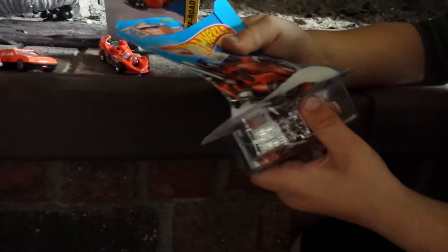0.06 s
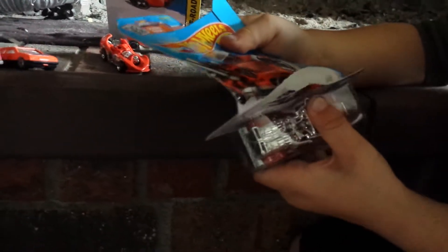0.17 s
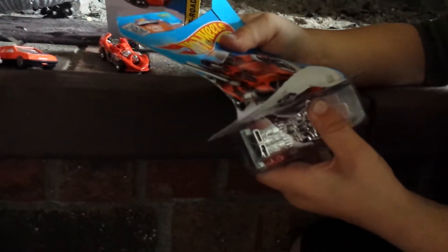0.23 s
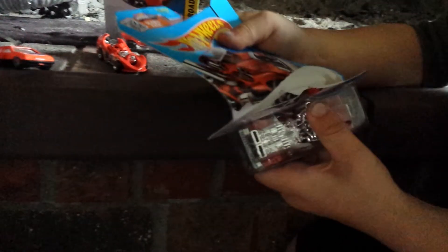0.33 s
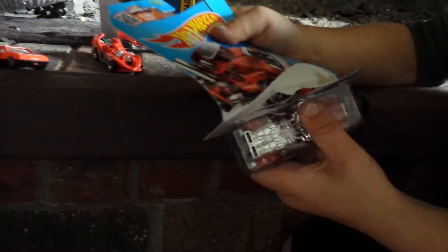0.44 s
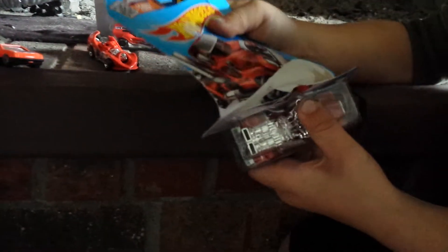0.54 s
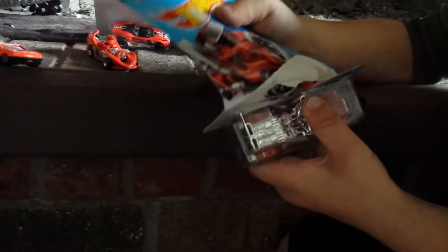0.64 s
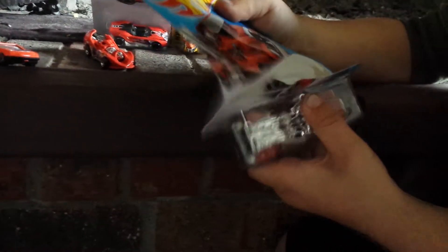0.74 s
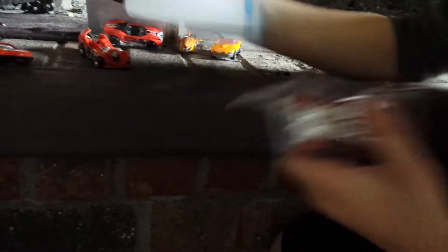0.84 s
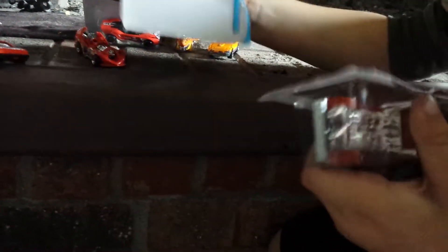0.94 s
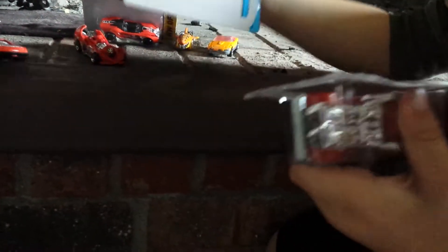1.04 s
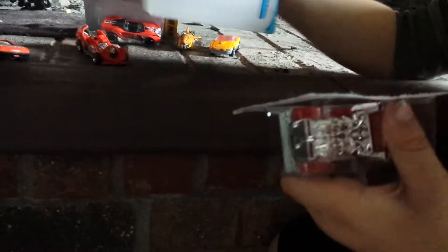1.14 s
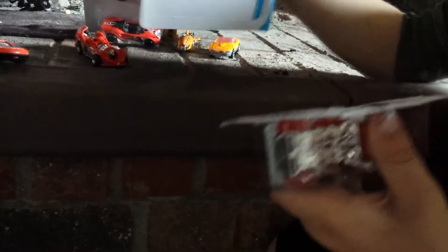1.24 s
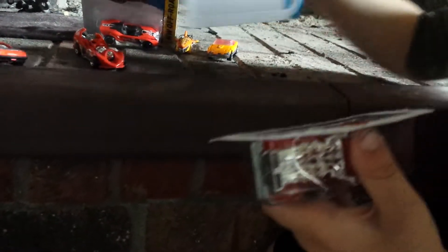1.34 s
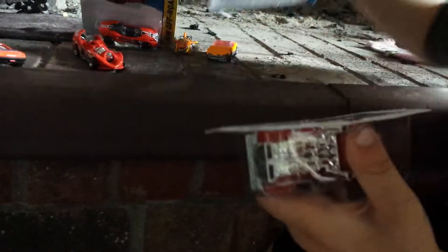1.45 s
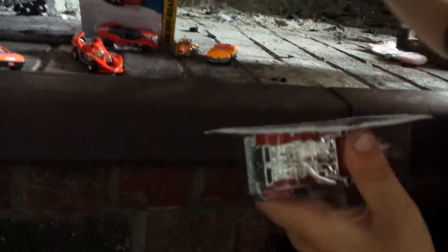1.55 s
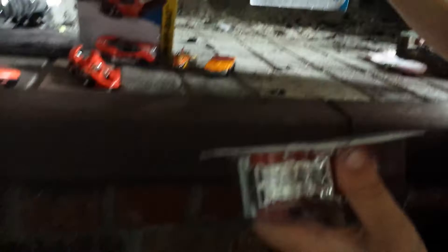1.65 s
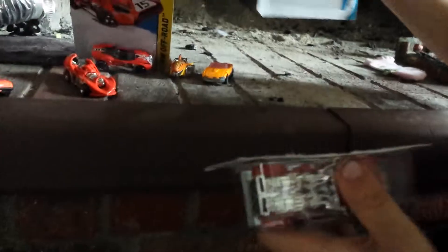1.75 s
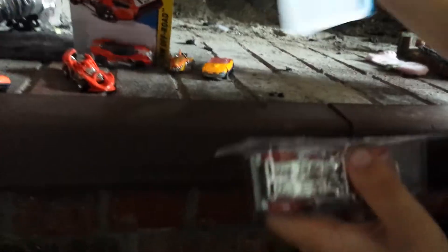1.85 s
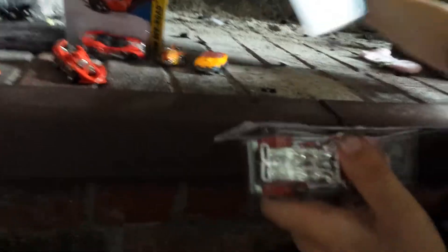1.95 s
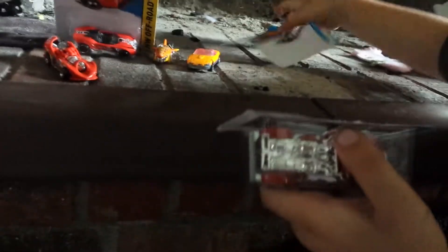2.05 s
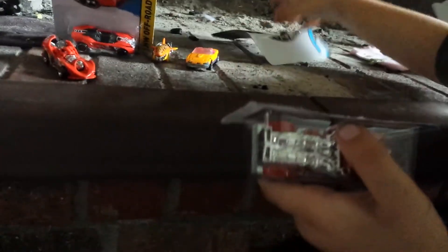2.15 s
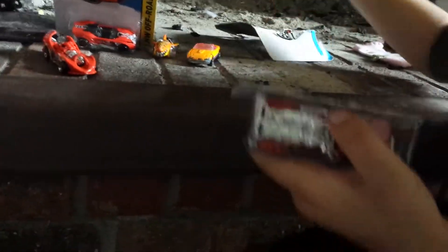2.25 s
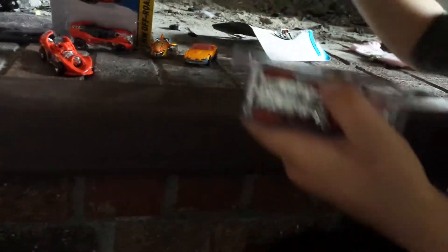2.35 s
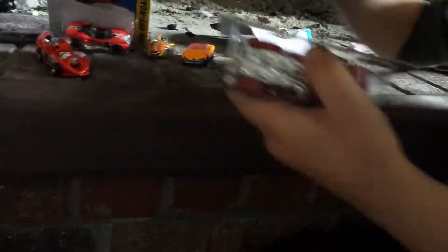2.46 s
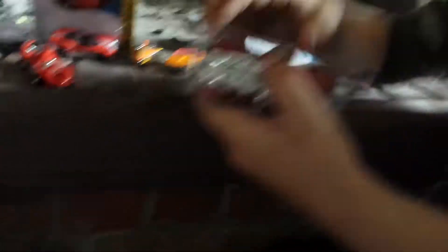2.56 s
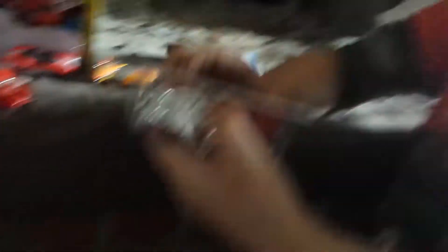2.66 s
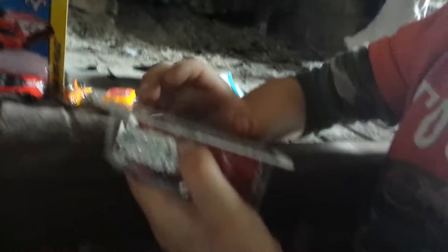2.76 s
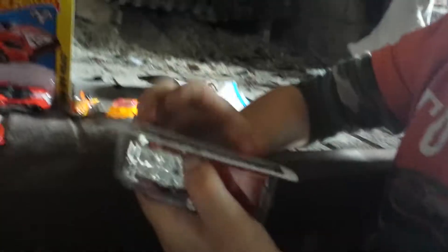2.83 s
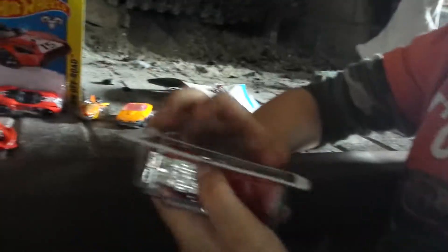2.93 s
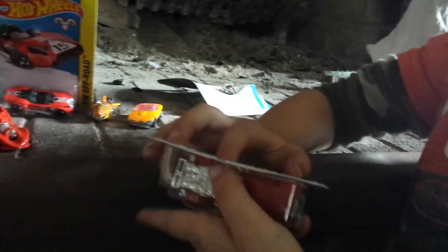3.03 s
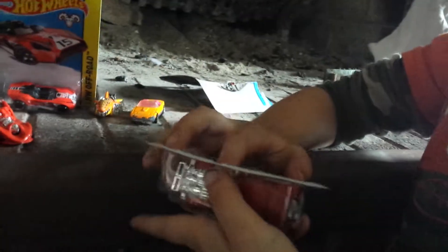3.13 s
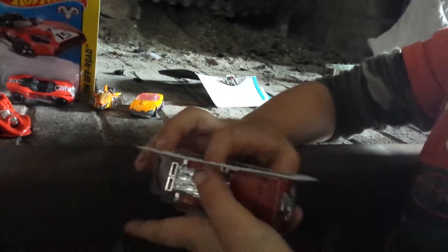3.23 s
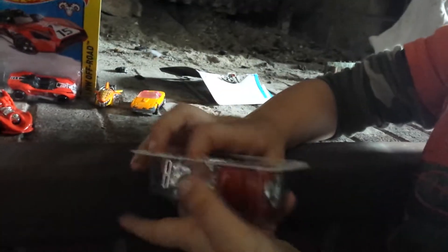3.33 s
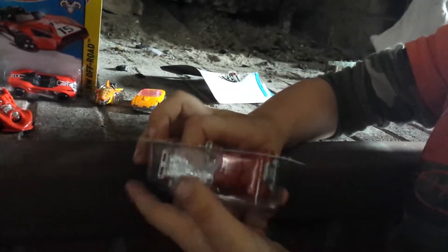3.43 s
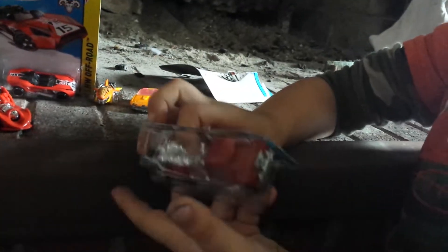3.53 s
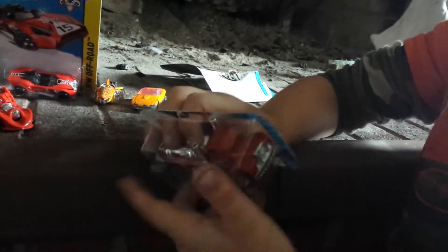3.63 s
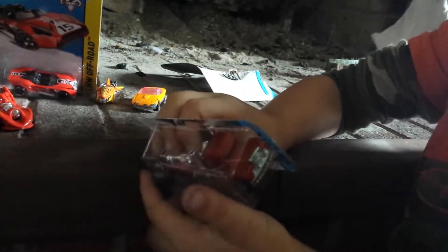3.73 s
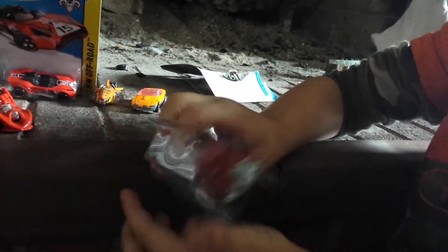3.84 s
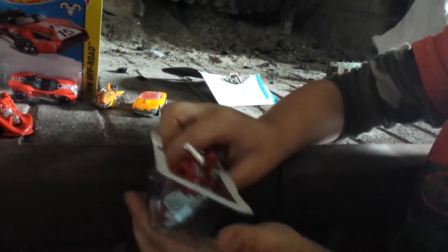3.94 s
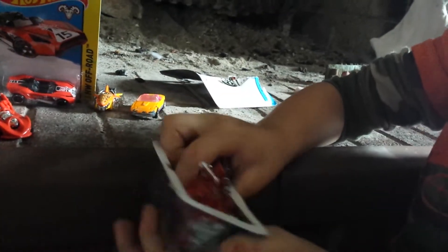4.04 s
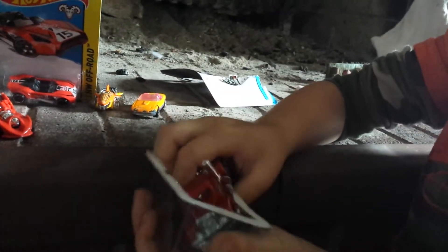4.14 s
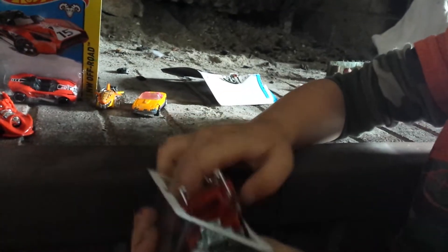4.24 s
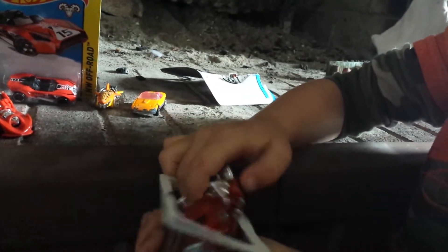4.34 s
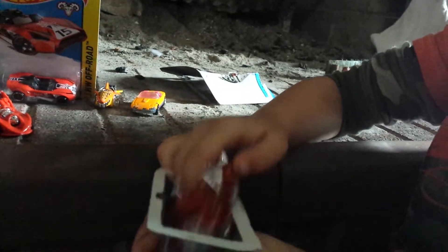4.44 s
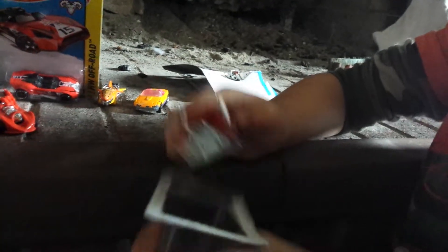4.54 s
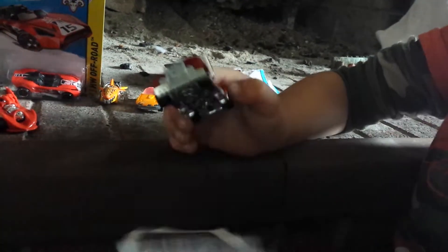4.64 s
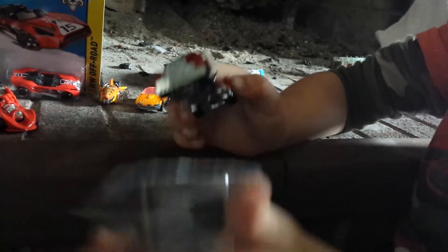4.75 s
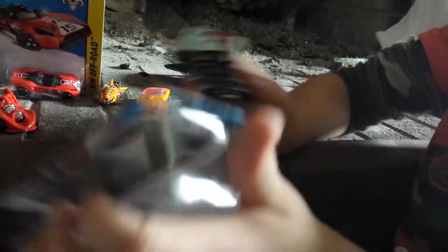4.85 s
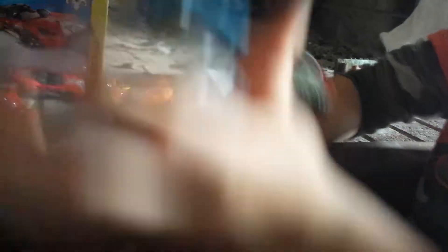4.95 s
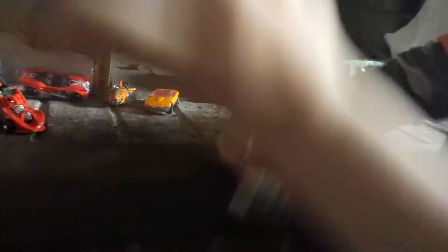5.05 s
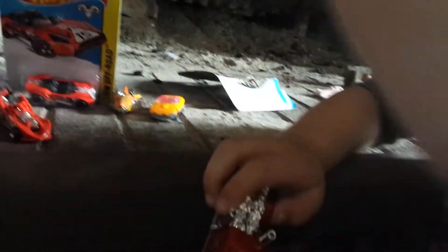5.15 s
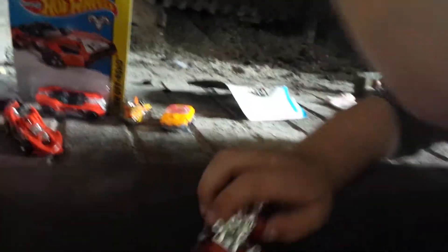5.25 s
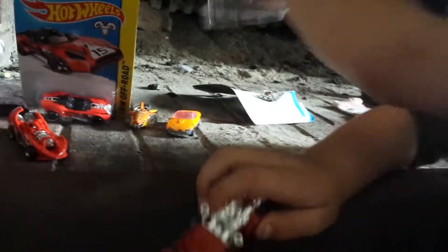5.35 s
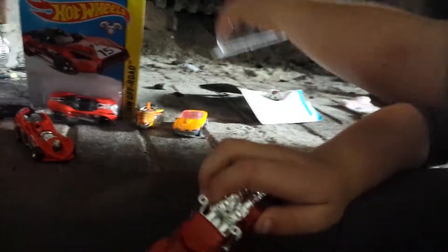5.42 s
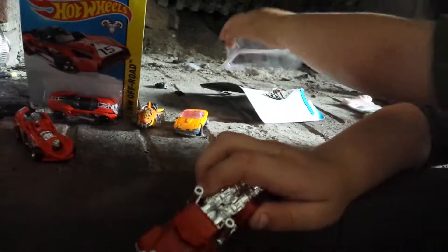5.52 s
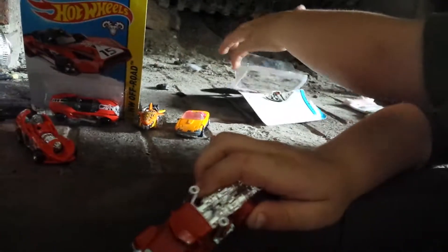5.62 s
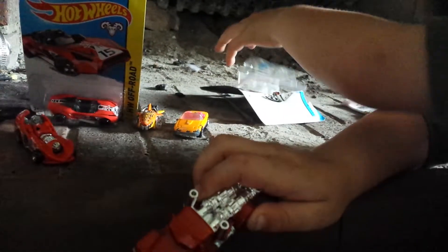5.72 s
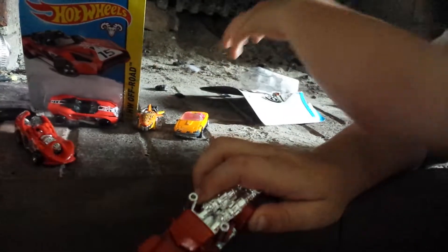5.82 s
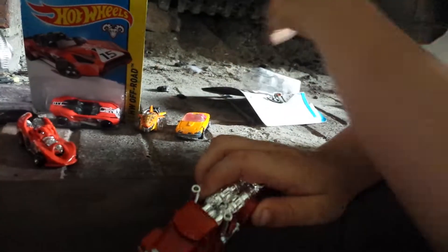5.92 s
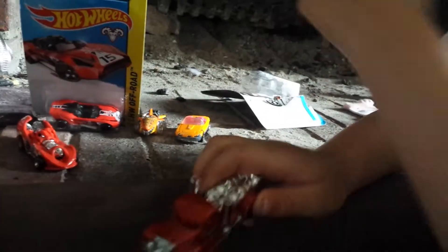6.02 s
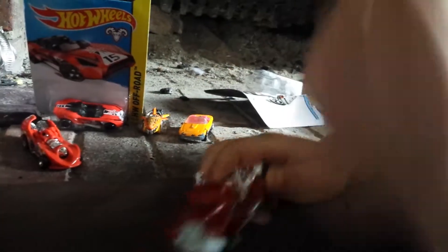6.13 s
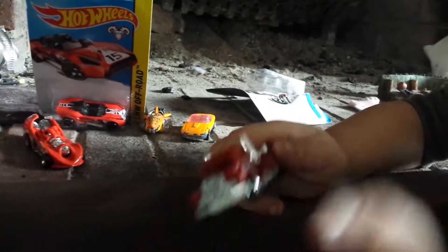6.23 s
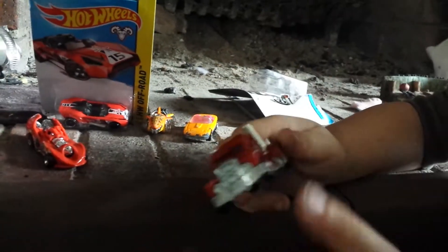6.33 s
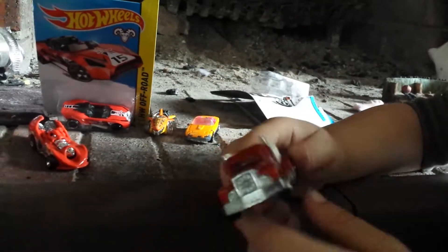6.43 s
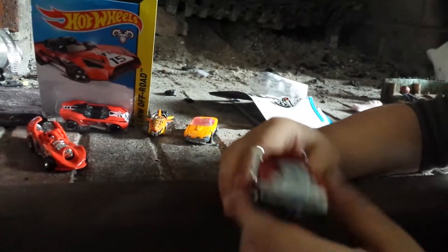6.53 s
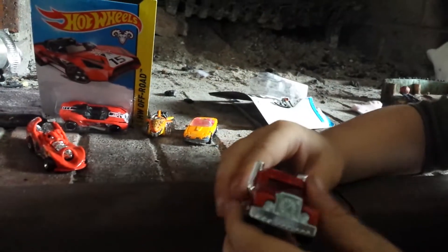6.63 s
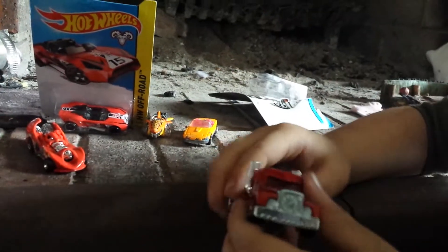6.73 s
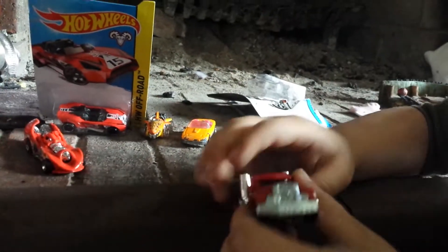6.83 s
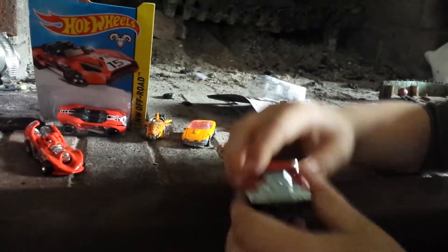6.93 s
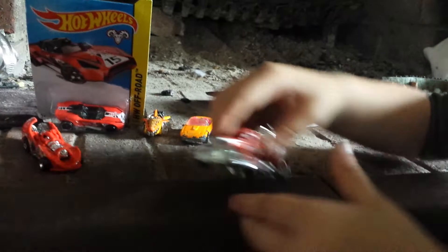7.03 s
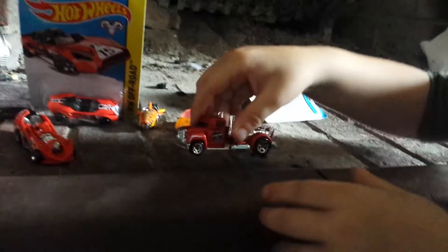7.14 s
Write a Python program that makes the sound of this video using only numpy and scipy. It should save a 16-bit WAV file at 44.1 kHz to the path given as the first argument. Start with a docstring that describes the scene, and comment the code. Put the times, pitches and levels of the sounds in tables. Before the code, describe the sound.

A small toy car's card and plastic pack is opened right beside a phone on a brick hearth. From 0 to 0.8 s card tears in short swelling rips with fine snapping fibres and crinkling, plus a plastic pop near 0.1 s. At about 0.85 s the pull peaks in a loud cluster of buckling cracks, then a single dry flick at 1.1 s. It goes nearly quiet until 2 s, when finger rubbing and light cracks return. A sharp crack lands at 3.05 s, more at 3.6 s, then one at 4.0 s with a brief metallic ring, and crackles and scrapes continue to 4.7 s. Isolated small knocks follow around 5.6 s. From 6.3 s tiny clicks and soft rubbing remain, with a thin wheel squeak near 6.8 s. Low rumbling air and soft thumps, mostly left, buffet the microphone; brick reflections are short and faint.

```python
"""Opening a toy car's pack

A child opens a toy car's pack at a brick hearth, a hand's length from a phone.
The backing card peels in tearing noise with snapping fibres, then flicks straight in one dry crack.
The thin plastic shell buckles in sharp cracks, made of noise bursts, ticks and ringing resonances.
Fingers slide as filtered noise, loose parts click, metal rings and a wheel squeaks.
Low noise and soft thumps of air buffet the microphone over a quiet background.
"""
import sys
import numpy as np
from scipy import signal
from scipy.fft import rfft, irfft, next_fast_len
from scipy.io import wavfile
from scipy.ndimage import uniform_filter1d

SR = 44100
rng = np.random.default_rng(int(sys.argv[2]) if len(sys.argv) > 2 else 0)


def digitize_waveform(pressure):
    """Quantize a signal to 16-bit integers and store it at the path in sys.argv[1].

    Rows of a 2-D input are taken as channels; values are limited to [-1, 1].
    """
    field = np.atleast_2d(pressure).T
    bounded = np.clip(field, -1, 1)
    quanta = np.round(bounded * 32767).astype(np.int16)
    wavfile.write(sys.argv[1], SR, quanta)


N = 316638
TIME = np.arange(N) / SR
LEAD = 256  # samples of faint swelling noise before each snap

# resonances of the plastic shell: (frequency [Hz], width [Hz], relative level [dB])
SHELL_MODES = [(266.4, 63, -8.5), (351.8, 28, -12), (656, 130, -23), (755, 110, -16), (918, 13, -7.5),
               (1023, 85, -19.5), (1278, 130, -5.5), (1451, 89, -3.5), (1619, 50, -7.5), (1831, 29, -10),
               (1940, 61, -4.5), (2565, 160, -11.5), (3014, 87, -7), (3920, 320, -6), (4625, 360, -7),
               (5750, 190, -2), (6070, 940, -10), (7150, 360, -12.5), (7590, 140, -7.5), (8650, 210, -8)]

STROKE_ATTACK_S, STROKE_T60_S = 0.041, 0.24  # how a finger stroke starts and dies away


def undb(db):
    """Turn decibels into a gain."""
    return 10 ** (np.asarray(db) / 20)


def unit(x):
    """Scale to an rms level of 1."""
    return x / np.sqrt(np.mean(x ** 2))


def fade(t, t60):
    """Exponential decay that falls by 60 dB in t60 seconds."""
    return np.exp(-np.log(1000) * t / t60)


def band(x, lo_hz, hi_hz, order=2):
    """Keep the frequencies between two limits, without looking ahead."""
    edges = [lo_hz, min(hi_hz, SR / 2 - 1)]
    return signal.sosfilt(signal.butter(order, edges, "band", fs=SR, output="sos"), x)


def colour(x, points):
    """Filter to a (frequency [Hz], level [dB]) curve without looking ahead, by way of the cepstrum."""
    size = next_fast_len(N + 8192, True)
    hz, db = np.transpose(points)
    freq = np.arange(size // 2 + 1) * SR / size
    curve_db = np.interp(np.log(freq + 1), np.log(hz), db)
    cepstrum = irfft(np.log(undb(curve_db)), size)
    # folding the second half onto the first makes the filter act only forwards in time
    cepstrum[1:size // 2] *= 2
    cepstrum[size // 2 + 1:] = 0
    return irfft(rfft(x, size) * np.exp(rfft(cepstrum)), size)[..., :N]


def walk(rate):
    """Wander in straight lines between random points, `rate` a second; the last of 2048 is held."""
    knots = rng.standard_normal(2048)
    return np.interp(TIME * rate, np.arange(len(knots)), knots)


def pair(shared, size=N):
    """Left and right noise with a share of their power in common."""
    common, left, right = rng.standard_normal((3, size))
    shared = np.clip(shared, 0, 1)
    return np.sqrt(shared) * common + np.sqrt(1 - shared) * np.array([left, right])


def ports(size, apart_hz):
    """Noise at two nearby microphone openings (ports): long waves alike, short waves unrelated."""
    common, left, right = rng.standard_normal((3, size))
    low = signal.butter(2, apart_hz, "low", fs=SR, output="sos")
    high = signal.butter(2, apart_hz, "high", fs=SR, output="sos")
    return signal.sosfilt(low, common) + signal.sosfilt(high, [left, right])


def add(out, s, sound):
    """Mix a sound in at time s."""
    start = max(int(s * SR), 0)
    out[:, start:start + sound.shape[-1]] += sound[..., :N - start]


def gesture(start, length, attack, t60):
    """Attack, hold and release of one movement of the hand."""
    return np.clip((TIME - start) / attack, 0, 1) * fade(np.maximum(TIME - start - length, 0), t60)


def together(gains):
    """Combine gains as unrelated sounds, which add in power."""
    return np.sqrt(sum(g ** 2 for g in gains))


def tilted(db, tilt_db):
    """Treble and body gains as a column."""
    return undb([[db + tilt_db / 2], [db - tilt_db / 2]])


def registers(db, tilt_db, thud_db, bite_db):
    """Low, body, bite and treble levels of a snap; the low thud follows the body."""
    thud_growth, thud_per_tilt = 0.61, 0.28  # dB gained per dB of body, dB lost per dB of brightness
    body, treble = db - tilt_db / 2, db + tilt_db / 2
    return [thud_db + thud_growth * body - thud_per_tilt * tilt_db, body, db + bite_db, treble]


def snap(modes, band_db, t60, ring_db, tick_db, swell_db, corner_hz=15000, cascade=.09, count=3,
         detune=0.021, scatter_db=2, apart_hz=4200, size=4096):
    """A sudden release: a quick run of slips, each a tick, a dense noise burst and ringing modes."""
    # edges of the low, body, bite and treble registers: one column (frequency [Hz])
    register_edges = [150, 600, 2400, 5000, 15500]
    t = np.arange(size) / SR
    burst = ports(size, apart_hz=1930) * fade(t, t60)
    burst /= np.sqrt(np.sum(burst ** 2) / 2)
    burst[:, 8] += undb(tick_db)

    hz, width, db = np.transpose(modes)[:, :, None]
    shift, strength, side = rng.standard_normal((3, len(modes), 1))
    # bending retunes the modes
    waves = np.exp((2j * np.pi * hz * (1 + detune * shift) - np.pi * width) * t)
    waves *= undb(db + scatter_db * strength) * np.sqrt(width / SR)
    waves *= rng.choice([-1, 1], (len(modes), 1))
    # high modes reach the two ports out of step
    skew = np.exp(1j * side * hz / apart_hz)
    ring = np.array([(waves * skew).sum(0).imag, (waves / skew).sum(0).imag])
    sound = burst + undb(ring_db) * ring

    # the fold runs on in further slips of random size
    lags = (rng.random(count) * cascade * t60 * SR).astype(int)
    sizes = 0.44 * rng.standard_normal(count)
    slips = sum(g * np.pad(sound, ((0, 0), (lag, 0)))[:, :size] for lag, g in zip(lags, sizes))
    sound = sound + slips
    # a long buckle takes longer to get going
    sound *= 1 - np.exp(-t / (0.0058 * t60))

    # faint noise swells just before the snap
    swell = pair(0.16, size=LEAD) * fade(t[:LEAD], 0.2 * t60)[::-1]
    swell = undb(swell_db) * sound[:, :LEAD].std() * swell
    low_pass = signal.butter(2, min(corner_hz, .45 * SR), fs=SR, output="sos")
    sound = signal.sosfilt(low_pass, np.hstack([swell, sound]))

    # set each register's level over the onset: 5 ms, or two cycles of its lowest pitch if longer
    out = 0
    for lo, hi, level_db in zip(register_edges, register_edges[1:], band_db):
        part = band(sound, lo, hi, order=3)
        span = max(SR // 200, 2 * SR // lo)
        out = out + undb(level_db) * part / part[:, LEAD:LEAD + span].std()
    return out


def friction(gains, spectrum, per_s, spread_db, hiss_db, flutter_db, treble_db, body_db):
    """Many tiny slips and fibre breaks over a hiss, coming in uneven spurts."""
    treble, body = gains
    # a few slips are much stronger than the rest
    strengths = undb(spread_db * np.minimum(rng.exponential(size=N), 4))
    grains = (rng.random(N) < per_s / SR) * strengths
    source = unit(grains * pair(0.29)) + undb(hiss_db) * ports(N, apart_hz=1500)
    source = colour(source, spectrum) * undb(flutter_db * walk(110))
    low = band(source, 300, 2900)
    high = band(source, 4200, 25000)
    return unit(high) * treble * undb(treble_db) + unit(low) * body * undb(body_db)


def air():
    """Arm movements push low noise and soft thumps, mostly to the left, over a swelling background."""
    # arm movements that push air: (start [s], length [s], relative level [dB])
    gust_moves = [(0, 0.94, -56), (0.107, 0.12, -47.5), (0.303, 0.15, -53.5), (2.07, 0.49, -61),
                  (2.35, 0.076, -49.5), (2.578, 0.47, -51), (3.09, 1.59, -65), (3.593, 0.12, -57),
                  (3.98, 0.13, -62), (4.553, 0.054, -58.5), (5.136, 0.34, -54), (5.587, 0.12, -55),
                  (5.75, 0.27, -69), (6.648, 0.59, -69)]
    # tone of the buffeting: (frequency [Hz], level [dB])
    buffet_curve = [(12, -32.5), (22, -17.5), (50, -2), (80, -1.5), (130, -5.5), (200, -12.5), (300, -13.5),
                    (500, -21), (1100, -75)]
    # soft thumps of air: (middle [s], frequency [Hz], relative level [dB], half length [s])
    air_thumps = [(2.343, 82, -40, 0.0085), (2.419, 100, -35.5, 0.011), (2.617, 94, -36, 0.0042),
                  (2.723, 115, -39, 0.018), (2.812, 131, -28.5, 0.0031), (2.986, 69, -42, 0.015)]
    # tone of the background: (frequency [Hz], level [dB])
    background_curve = [(25, -34.5), (45, -15.5), (70, -14.5), (150, -5.5), (210, -12), (290, -9.5),
                        (420, -23.5), (750, -19.5), (1200, -23), (2600, -27.5), (7300, -28), (15000, -34)]
    attack_s, t60_s = 0.031, .35
    draught_db, background_db = -83, -59  # the draught is the still air between movements

    pushes = [undb(db) * gesture(s, length, attack_s, t60_s) for s, length, db in gust_moves]
    push = together(pushes + [undb(draught_db)])
    gusts = unit(colour(pair(0.54), buffet_curve)) * push * undb(2 * walk(25))
    thumps = np.zeros(N)
    for s, hz, db, half in air_thumps:
        thumps += undb(db) * np.sin(2 * np.pi * hz * (TIME - s)) * np.exp(-((TIME - s) / half) ** 2)
    noise = ports(N, apart_hz=890) + undb(-8.5) * pair(0)
    background = unit(colour(noise, background_curve)) * undb(background_db + 1.14 * walk(3))
    return (gusts + thumps) * undb([[3], [-11]]) + background


def pulling():
    """Treble and body gain of the tear: each pull swells steadily and drops once the glue gives."""
    # pulls: (peak time [s], relative level [dB], treble over body [dB], build [dB/s], release [dB/s])
    card_pulls = [(.2, -30, 8, 71, 350), (.38, -36.5, 6.5, 67, 43.5), (.875, -22.5, 5, 228.5, 596)]
    peel_end_s = 1.3  # the card has come clear
    gains = []
    for s, db, tilt_db, build, release in card_pulls:
        drop_db = np.maximum(build * (s - TIME), release * (TIME - s))
        gains.append(tilted(db, tilt_db) * undb(-drop_db))
    return together(gains) * (TIME < peel_end_s)


def card():
    """The card tears away from the glued rim; stronger fibres snap one by one."""
    # tone of the tearing: (frequency [Hz], level [dB])
    peel_curve = [(200, -12.5), (480, -17.5), (700, -14), (1000, 0), (1310, -8), (1810, -0.5), (2400, -0.5),
                  (3600, 1), (5600, -2.5), (6500, -4.5), (7970, -3.5), (9900, -9.5), (11500, -0.5),
                  (14500, -6.5)]
    # strongest fibres snapping: (time [s], level [dB], treble over body [dB])
    fibre_snaps = [(.0243, -46.5, 26), (.0504, -43, 15), (.0749, -42, 22), (.0994, -43, 16),
                   (.2047, -32, 10), (.3234, -38, 15), (.3437, -44, 1), (.4042, -40, -2),
                   (.5746, -44.5, 15), (.6466, -44, 13.5), (.7307, -40, 18), (.7516, -44.5, 26.5),
                   (3.6268, -33.5, 18)]
    out = friction(pulling(), peel_curve, per_s=2300, spread_db=3.0, hiss_db=-4, flutter_db=2.5,
                   treble_db=0.5, body_db=-1.5)
    for s, db, tilt_db in fibre_snaps:
        band_db = registers(db, tilt_db, thud_db=-28.5, bite_db=1)
        fibre = snap(SHELL_MODES, band_db, t60=0.0061, ring_db=-1.5, tick_db=-8, swell_db=-13.5,
                     corner_hz=17960)
        add(out, s - LEAD / SR, fibre)
    return out


def rubbing():
    """Treble and body gain of the fingers: strokes over a steady grip."""
    # finger strokes: (start [s], length [s], relative level [dB], treble over body [dB])
    finger_strokes = [(1.62, .2, -66.5, 4.5), (1.765, .32, -58, 2), (2.047, 0.32, -52, 2.5),
                      (2.365, 0.88, -56.5, -2.5), (2.948, 0.05, -56.5, -1), (3.383, 1, -58, -2.5),
                      (4.05, 0.37, -54.5, -5), (4.47, .18, -51, -2), (4.696, 0.26, -67, 4),
                      (4.904, 0.93, -59, -2.5), (5.807, 1, -65, 0), (6.73, 0.44, -57, -3)]
    grip_db = -71.5  # a still grip rustles faintly
    gains = []
    for s, length, db, tilt_db in finger_strokes:
        gains.append(tilted(db, tilt_db) * gesture(s, length, STROKE_ATTACK_S, STROKE_T60_S))
    return together(gains + [undb(grip_db)])


def fingers():
    """Skin slides over card, plastic and the car in many tiny slips and a hiss."""
    # tone of the sliding: (frequency [Hz], level [dB])
    slide_curve = [(240, -29.5), (400, -3), (465, -6), (567, -8), (949, -5), (1210, -11), (1540, -6),
                   (2390, -8.5), (3610, -3.5), (5680, 2), (9090, -10), (13900, -7.5), (15000, -26.5)]
    return friction(rubbing(), slide_curve, per_s=700, spread_db=6.5, hiss_db=7.5, flutter_db=2.0,
                    treble_db=2.0, body_db=-3.5)


def crinkle(count=14, size=120, spread_db=2, low_db=-12, bite_db=-4, vary_db=3):
    """Small creases let go at random, louder the harder the pack is pulled or rubbed."""
    # spells of fine crinkling: (start [s], end [s], rate [ticks/s], relative level [dB])
    crinkle_spells = [(0.029, 0.796, 90, 0.5), (2.448, 3.002, 21, -10), (3.453, 4.6, 50, 7.5),
                      (6.305, 7.166, 34, 7)]
    effort = together([pulling(), rubbing()]).mean(0)
    # a small stock of ticks with varied tone, used in turn
    tints = vary_db * rng.standard_normal((count, 4))
    ticks = [snap(SHELL_MODES, tint + [low_db, 0, bite_db, 0], t60=.008, ring_db=-1.5, tick_db=-5.5,
                  swell_db=-16, size=1024) for tint in tints]
    out = np.zeros((2, N))
    for start, end, per_s, db in crinkle_spells:
        gaps, strengths = rng.exponential(size=(size, 2)).T
        times = start + np.cumsum(gaps) / per_s
        for k in np.flatnonzero(times < min(end, TIME[-1])):
            level_db = db + spread_db * (min(strengths[k], 3) - 7.5)
            gain = effort[int(times[k] * SR)] * undb(level_db)
            add(out, times[k], gain * ticks[k % count])
    return out


def shell(panel_width_hz=130, panel_db=3):
    """The plastic bubble buckles, scrapes on the card and bumps the hand and hearth."""
    # buckles and knocks: (time [s], relative level [dB], treble over body [dB], burst t60 [s],
    # pitch of the flexing panel before random detuning [Hz])
    shell_cracks = [(.1266, -23, -1.5, 0.026, 980), (0.817, -35, 16, 0.021, 1850),
                    (.827, -23.5, 2, .038, 1340), (0.847, -10.5, -4.5, 0.034, 1040),
                    (.8575, -23.5, -4, 0.045, 1610), (0.8706, -19.5, -4, 0.041, 1780),
                    (0.8834, -18, -6.5, 0.026, 1780), (1.628, -52, 2.5, 0.035, 3360),
                    (2.07, -46, 2, 0.023, 1250), (2.0874, -33.5, 0, 0.047, 1575),
                    (2.389, -45.5, 3, .014, 3100), (2.4147, -35, 4.5, 0.015, 3160),
                    (2.4626, -40, 2.5, 0.013, 1670), (2.54, -53, 11, .014, 2500),
                    (2.7589, -41, 2, 0.025, 2070), (2.945, -38, 5, .04, 1970),
                    (2.9586, -43.5, -1, .045, 2000), (3.021, -31.5, -5.5, 0.027, 2040),
                    (3.049, -18.5, 2, 0.05, 1940), (3.0803, -29.5, 4.5, 0.05, 3160),
                    (3.107, -36, -2, 0.071, 1980), (3.385, -39, -3.5, 0.016, 1800),
                    (3.397, -40, -7, 0.034, 1900), (3.45, -47.5, -3, 0.052, 900),
                    (3.5144, -37, -3.5, 0.029, 1500), (3.5446, -43.5, 3, 0.072, 1910),
                    (3.6349, -25.5, 0, 0.043, 1955), (3.6487, -23.5, -2, 0.013, 1580),
                    (3.7257, -50, -14, 0.029, 1490), (3.885, -48.5, -1, 0.034, 1450),
                    (3.9777, -42, 6, 0.057, 3050), (3.994, -39, 6, 0.032, 3300),
                    (4.0069, -21, 2, 0.042, 2340), (4.2626, -42.5, -2, 0.052, 1570),
                    (4.3139, -32, 11.5, 0.035, 1895), (4.3801, -42.5, -10, 0.045, 3050),
                    (4.388, -30, 21.5, 0.025, 2920), (4.4181, -32, -2.5, 0.034, 1350),
                    (4.4274, -31.5, 0.5, 0.016, 1430), (4.5212, -35.5, 3, 0.035, 3230),
                    (4.6092, -21.5, 2, 0.008, 1896), (4.645, -43.5, 13.5, 0.043, 1970),
                    (4.6882, -55, 14, 0.043, 2480), (4.982, -50, 15, 0.021, 3140),
                    (5.2254, -50, 0, 0.036, 2240), (5.5297, -46, -9.5, 0.024, 1700),
                    (5.6227, -30, 11, 0.0099, 1980), (5.836, -50, -8.5, .035, 1270)]
    # short scrapes of card and plastic: (middle [s], half length [s], level [dB])
    short_scrapes = [(0.199, 0.03, -33.5), (0.415, 0.011, -42), (0.888, 0.015, -28.5), (1.003, 0.0081, -44),
                     (1.415, 0.042, -48.5), (2.114, 0.036, -40), (2.742, 0.058, -51), (3.014, 0.026, -42),
                     (3.06, 0.032, -37), (3.245, 0.0055, -44.5), (3.541, 0.022, -45.5),
                     (3.644, .014, -28.5), (3.992, 0.024, -45), (4.18, .018, -50.5), (4.275, 0.04, -47.5),
                     (4.605, 0.01, -34), (5.254, 0.016, -49)]
    # dull bumps of the pack: (time [s], level [dB], t60 [s])
    dull_bumps = [(.127, -36, .07), (.405, -40, .07), (.884, -34, .13), (2.414, -43, .05),
                  (3.386, -42, .06), (5.624, -42, .28), (5.836, -50.5, .2)]
    bite_db_per_octave, usual_panel_hz = 3.5, 2150  # small stiff panels bite harder

    out = np.zeros((2, N))
    for s, db, tilt_db, t60, panel_hz in shell_cracks:
        bite_db = bite_db_per_octave * np.log2(panel_hz / usual_panel_hz)
        band_db = registers(db, tilt_db, thud_db=-27.5, bite_db=bite_db)
        modes = list(SHELL_MODES) + [(panel_hz, panel_width_hz, panel_db)]
        crack = snap(modes, band_db, t60, ring_db=4, tick_db=-2.5, swell_db=-2.5, corner_hz=9840)
        add(out, s - LEAD / SR, undb(-1.31) * crack)

    # scraping: the edge sticks and slips as fluttering noise and rings the shell
    slips = ports(N, apart_hz=1603) * undb(1.8 * walk(350))
    body = sum(undb(db) * band(slips, hz - width / 2, hz + width / 2, order=1)
               for hz, width, db in SHELL_MODES)
    scrape = unit(unit(body) + undb(-0.5) * unit(band(slips, 1200, 3100, order=1)))
    out += scrape * sum(undb(db) * np.exp(-((TIME - s) / half) ** 2) for s, half, db in short_scrapes)

    t = TIME[:SR // 2]
    for s, db, t60 in dull_bumps:
        add(out, s, undb(db) * fade(t, t60) * unit(band(pair(0.83, size=len(t)), 200, 1200)))
    return out


def flick():
    """The freed card springs straight: one dry crack with hardly any thud or ring."""
    time_s, level_db, t60_s = 1.0808, -20, 0.0077
    out = np.zeros((2, N))
    band_db = registers(level_db, tilt_db=4.5, thud_db=-33.5, bite_db=7.5)
    crack = snap(SHELL_MODES, band_db, t60_s, ring_db=-7.5, tick_db=-3.5, swell_db=-18.5,
                 corner_hz=9300, count=1)
    add(out, time_s - LEAD / SR, crack)
    return out


def toy():
    """The metal body rings briefly as it is freed; loose wheels and body click."""
    # clicks of wheels and body: (time [s], relative level [dB], treble over body [dB])
    car_clicks = [(6.3211, -51.5, 6), (6.3669, -54.5, -2), (6.4444, -54.5, -5), (6.475, -56, -3),
                  (6.5937, -47, 29), (6.604, -47.5, 11), (6.621, -49, 14), (6.6776, -49, 8),
                  (6.7777, -52.5, 14), (6.961, -56.5, 32), (7.0308, -49.5, 9), (7.052, -49, 14)]
    # resonances of the car: (frequency [Hz], width [Hz], relative level [dB])
    car_modes = [(1130, 110, -18.5), (1736, 160, 3), (2260, 220, 1.5), (4400, 160, -17), (5710, 220, 8),
                 (7740, 360, 9.5), (10300, 1100, 12.5)]
    # knocks that ring the metal: (time [s], relative level [dB])
    car_knocks = [(4.013, -37)]
    # ringing tones of the metal: (frequency [Hz], relative level [dB], t60 [s])
    metal_tones = [(1140, -10, .25), (1850, -1, .13), (2067, 5.5, .1), (2230, -6, 0.45), (2230, -27, 0.12),
                   (3370, -5.5, 0.25), (4250, -13, .11)]
    out, t = np.zeros((2, N)), TIME[:SR // 2]
    for s, db, tilt_db in car_clicks:
        band_db = registers(db, tilt_db, thud_db=-24.5, bite_db=3.5)
        click = snap(car_modes, band_db, t60=0.028, ring_db=-0.5, tick_db=-2, swell_db=4.5,
                     corner_hz=11440)
        add(out, s - LEAD / SR, undb(-2.0) * click)
    ring = sum(undb(db) * np.sin(2 * np.pi * hz * t) * fade(t, t60) for hz, db, t60 in metal_tones)
    for s, db in car_knocks:
        add(out, s, undb(db) * ring)
    return out


def wheel(per_s=140):
    """A wheel turns on its dry axle, which sticks and slips in uneven spurts and squeaks thinly."""
    start_s, length_s, level_db = 6.77, 0.28, -57
    pitch_hz, width_hz = 5680, 180
    slips = (rng.random(N) < per_s / SR) * pair(0.74) * undb(2.5 * walk(25))
    squeak = unit(band(slips, pitch_hz - width_hz / 2, pitch_hz + width_hz / 2, order=1))
    return squeak * undb(level_db) * gesture(start_s, length_s, STROKE_ATTACK_S, STROKE_T60_S)


def hearth(x, early_db=-13, early_t60=0.0368, late_db=-19, low_t60=0.32, high_t60=0.26):
    """Add quick reflections from the bricks, then the faint tail of the space around."""
    t = TIME[:SR // 2]
    noise = ports(len(t), apart_hz=1223)
    early = band(noise, 200, 8000, order=1) * fade(t, early_t60) * (t > .003)
    late = band(noise, 81, 1200, order=1) * fade(t, low_t60)
    late = late + band(noise, 1500, 7600) * fade(t, high_t60)
    response = undb(early_db) * unit(early) + undb(late_db) * unit(late * (t > .01))
    response = response / np.sqrt(len(t))
    return x + signal.fftconvolve(x, response, axes=1)[:, :N]


def scene(flick_room=0.69):
    """All handling heard in the hearth; the card is held clear of the bricks when it flicks."""
    crack = flick()
    handling = card() + fingers() + crinkle() + shell() + toy() + wheel()
    return hearth(handling + flick_room * crack) + (1 - flick_room) * crack + air()


def gain_control(x):
    """The phone's gain sinks after a sound above the knee and creeps back."""
    knee_db, recovery_db_per_s, attack_s = -19, 4.5, 0.18
    power = uniform_filter1d(np.mean(x ** 2, 0), SR // 30)
    level_db = 10 * np.log10(np.maximum(power, 1e-12))
    recovered = recovery_db_per_s * TIME
    # hold the deepest cut so far, less what has been recovered since
    duck_db = np.maximum.accumulate(np.maximum(level_db - knee_db, 0) + recovered) - recovered
    keep = np.exp(-1 / (attack_s * SR))
    return x * undb(-signal.lfilter([1 - keep], [1, -keep], duck_db))


def record(dry, ceiling=1.0):
    """Two unlike ports, the left a little further away; gain ducks, peaks are rounded, the top is cut."""
    # tone of the left port, shaded in the treble: (frequency [Hz], level [dB])
    left_curve = [(100, 2.5), (1000, -0.5), (3000, 1), (6000, 1.5), (8000, -1), (10000, -9.5),
                  (12500, -12.5), (15000, -17.5)]
    # tone of the right port: (frequency [Hz], level [dB])
    right_curve = [(100, 2), (1000, -1), (3000, 1.5), (6000, -2.5), (8000, 4.5), (10000, 2), (15000, -2)]
    top_hz = 14700
    left = np.pad(colour(dry[0], left_curve), (3, 0))[:N]  # three samples later
    heard = np.array([left, colour(dry[1], right_curve)])
    heard = ceiling * np.tanh(gain_control(heard) / ceiling)
    return signal.sosfilt(signal.ellip(8, .2, 90, top_hz, fs=SR, output="sos"), heard)


dry = scene()
out = record(dry)
digitize_waveform(out)
```